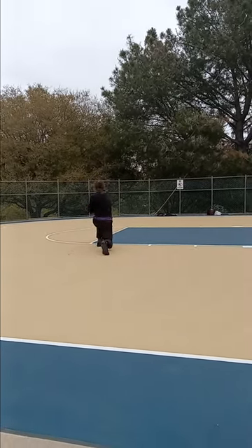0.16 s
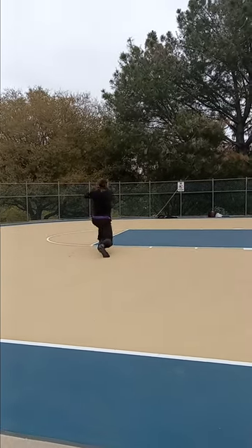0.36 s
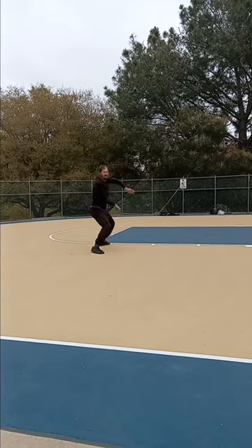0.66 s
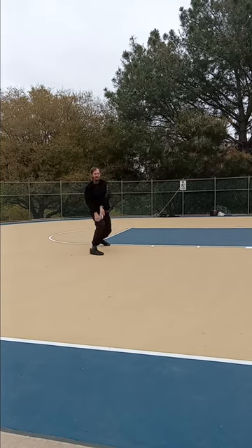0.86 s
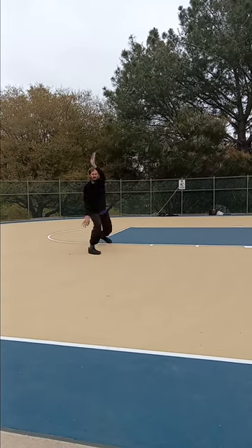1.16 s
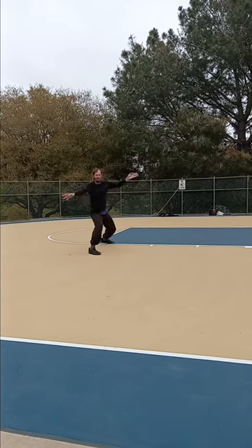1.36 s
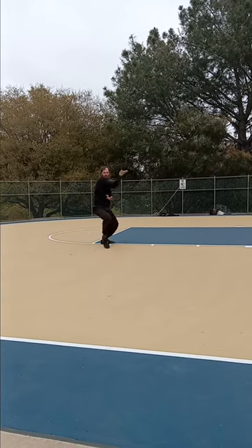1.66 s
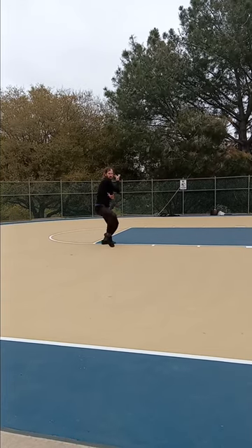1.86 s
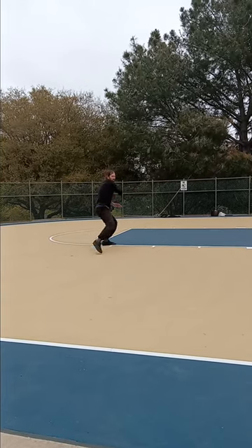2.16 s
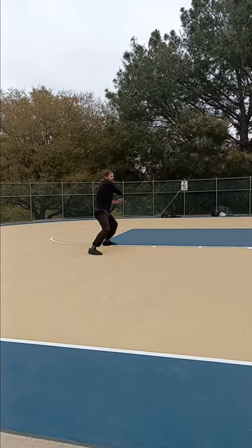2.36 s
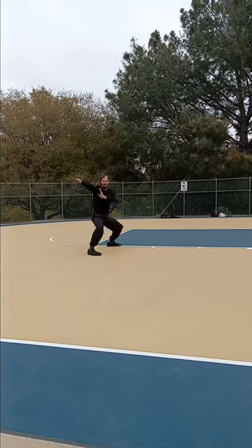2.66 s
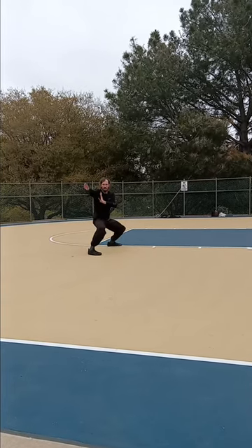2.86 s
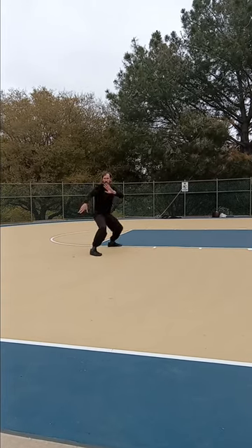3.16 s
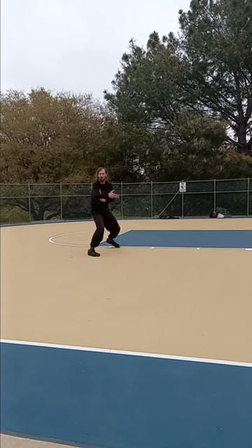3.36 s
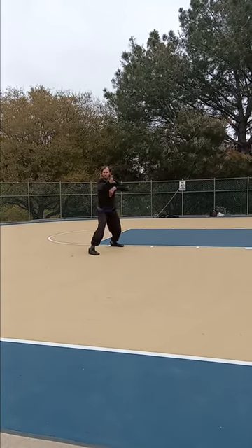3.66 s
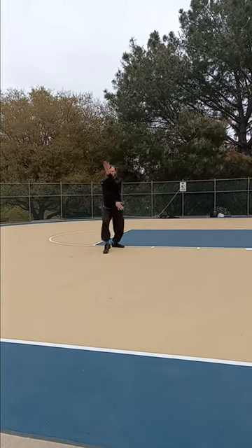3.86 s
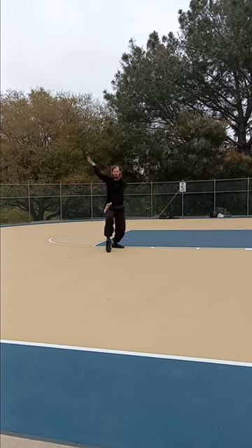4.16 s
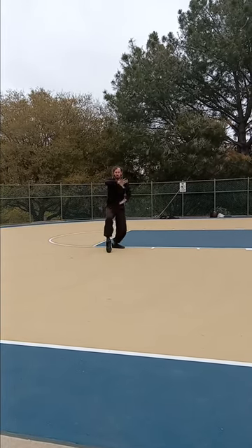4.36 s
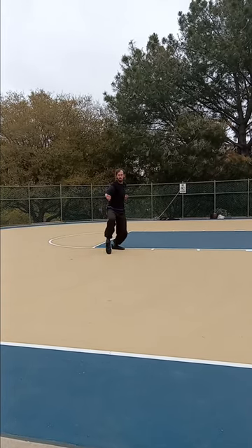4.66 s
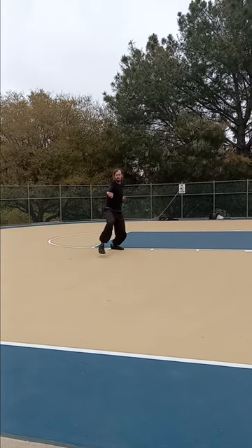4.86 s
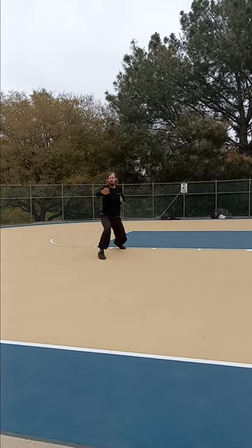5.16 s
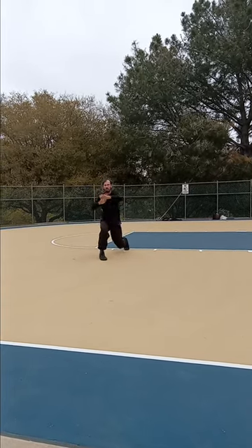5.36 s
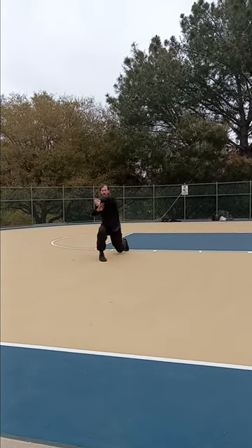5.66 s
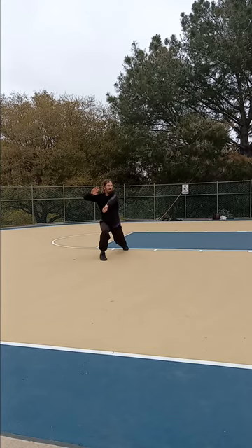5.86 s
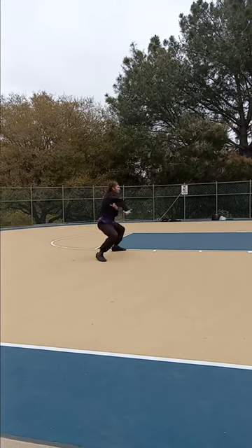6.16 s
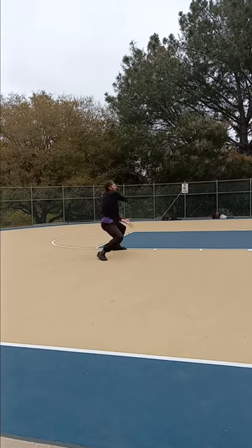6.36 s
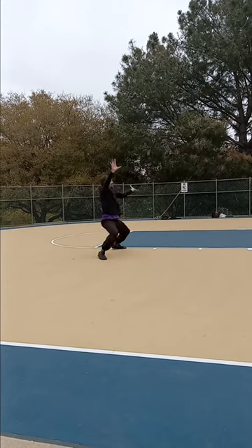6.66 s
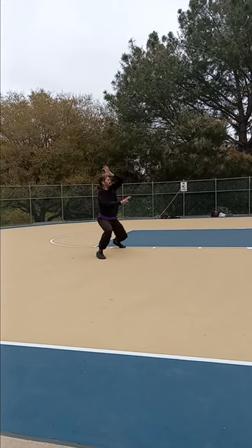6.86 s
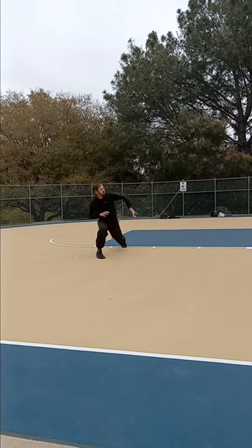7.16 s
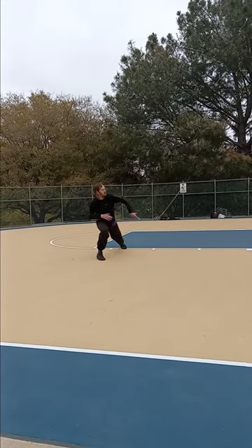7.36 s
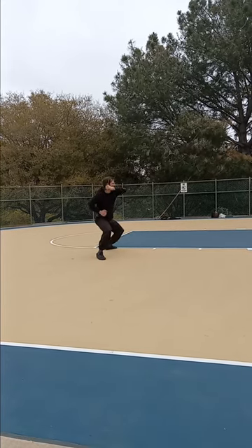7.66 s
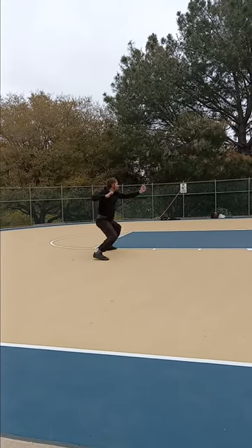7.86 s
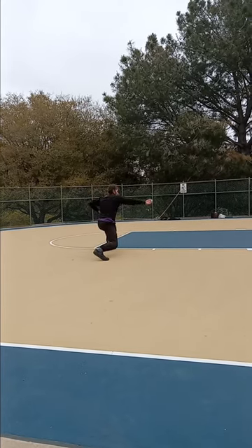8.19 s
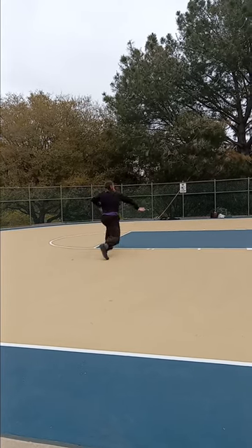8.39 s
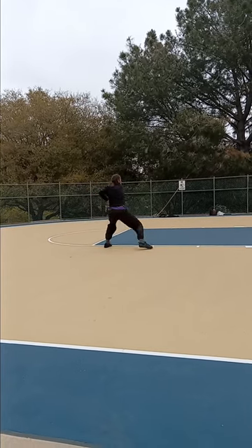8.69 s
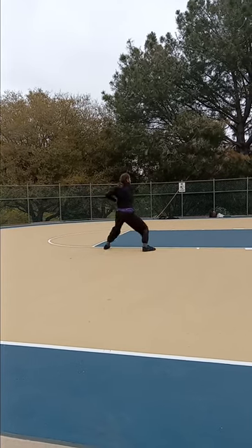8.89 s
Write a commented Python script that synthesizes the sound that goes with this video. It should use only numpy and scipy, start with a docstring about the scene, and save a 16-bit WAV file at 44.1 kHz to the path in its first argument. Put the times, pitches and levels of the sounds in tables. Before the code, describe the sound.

Shoes scuff and scrape on a hard outdoor court and sleeves swish while small birds chirp and trill nearby.

```python
"""Martial arts form on an outdoor court

Some metres away, soles pivot and scrape over grit, feet land softly, and sleeves swish with a reflection
off the hard ground. Small birds chip, trill and sing in the trees behind the fence: pure notes that bend
or buzz. Distant traffic rumbles under a hush of air and leaves."""
import sys
import numpy as np
from scipy import signal
from scipy.fft import rfft, irfft
from scipy.io import wavfile
from scipy.ndimage import uniform_filter1d, map_coordinates

SR = 44100
rng = np.random.default_rng(int(sys.argv[2]) if len(sys.argv) > 2 else 0)


def inscribe(sig):
    """Save sig as 16-bit PCM at rate SR to the path in sys.argv[1].

    A 1-D sig is mono; a 2-D sig holds one channel per row.
    Samples are clipped to [-1, 1] before scaling.
    """
    pcm = np.round(np.clip(np.atleast_2d(sig).T, -1, 1) * 32767)
    wavfile.write(sys.argv[1], SR, pcm.astype(np.int16))


N = 398214
TIME_S, FREQS_HZ = np.arange(N) / SR, np.fft.rfftfreq(N, 1 / SR)
CONTROL_S = TIME_S[::16]

# Traffic spectrum. Each row: frequency in Hz, relative density in dB.
TRAFFIC_SPECTRUM = [(13, -42), (22, -30.5), (56, -1), (80, 5), (183, 0.5), (232, -9.5), (332, -12),
                    (520, -23.5), (680, -62), (1140, -120)]
# Spectrum of air and leaves. Each row: frequency in Hz, relative density in dB.
AIR_SPECTRUM = [(15, -39), (25, -9), (76, 11), (195, -12), (575, -20.5), (887, -12.5), (1440, -16.5),
                (1650, -19.5), (3430, -22.5), (3920, -24.5), (4490, -24.5), (5280, -22), (6560, -21.5),
                (8360, -44), (16000, -58)]
# Echo tail of fence and foliage. Each row: frequency in Hz, 60 dB decay time in seconds.
TAIL_T60 = [(300, .5), (2000, 0.39), (5000, 0.26), (12000, 0.76)]
# Falling contact calls. Each row: start and length in seconds, starting pitch in Hz, level in dB.
BIRD_CHIPS = [(0.002, 0.032, 5260, -60.5), (0.146, 0.019, 5140, -46), (0.909, 0.037, 5200, -50),
              (1.223, 0.036, 5600, -44.5), (2.044, 0.073, 5200, -56.5), (2.653, 0.041, 5400, -48.5),
              (2.686, 0.12, 5240, -49.5), (2.878, 0.034, 5700, -46.5), (2.965, 0.07, 5210, -47.5),
              (3.21, 0.076, 5120, -47), (3.432, 0.073, 5200, -45), (4.083, 0.0343, 5820, -39.5),
              (4.707, 0.032, 5260, -48), (5.049, 0.037, 5870, -35.5), (5.46, 0.056, 5230, -59.5),
              (5.997, 0.029, 5730, -37), (6.417, 0.032, 5200, -57), (7.434, 0.048, 5450, -63.5),
              (7.495, 0.021, 5850, -44.5), (7.929, 0.061, 5730, -57.5), (8.174, 0.067, 5230, -64.5),
              (8.735, 0.04, 5800, -42)]
# Downward song notes. Each row: start and length in seconds, starting pitch in Hz, level in dB.
BIRD_SLURS = [(1.911, 0.032, 3630, -54.5), (2.101, 0.028, 4120, -59), (2.132, 0.015, 3800, -54),
              (2.24, 0.031, 4200, -59), (2.264, 0.033, 3700, -47.5), (2.529, 0.018, 3760, -49.5),
              (2.602, 0.016, 3690, -47), (2.691, 0.029, 5120, -52.5), (2.725, 0.018, 4280, -51.5),
              (2.894, 0.029, 3850, -52.5), (3.151, 0.046, 5450, -50), (3.47, 0.044, 5160, -50),
              (3.517, .037, 3600, -47), (3.795, 0.044, 3240, -51), (3.953, 0.07, 3230, -50),
              (7.766, 0.042, 3360, -65.5), (7.924, .06, 3290, -63.5)]
# Upward song notes. Each row: start and length in seconds, starting pitch in Hz, level in dB.
BIRD_FLICKS = [(1.968, .022, 3100, -60.5), (2.117, 0.0173, 3000, -57), (2.565, 0.0197, 2950, -59),
               (2.752, 0.049, 3500, -53)]
# Near-level song notes. Each row: start and length in seconds, final pitch in Hz, relative level in dB.
BIRD_WHISTLES = [(0.622, 0.068, 2766, -68.5), (0.715, 0.12, 3920, -73), (1.552, 0.066, 7400, -70),
                 (2.741, 0.016, 3480, -43.5), (2.921, 0.033, 3460, -46), (3.015, 0.068, 3800, -57),
                 (3.238, 0.11, 3390, -46), (3.27, .08, 4990, -56), (4.133, 0.13, 4260, -66.5),
                 (4.637, 0.093, 7780, -79), (6.086, 0.083, 4400, -66), (6.557, 0.065, 4440, -68.5),
                 (8.191, 0.069, 4430, -69.5)]
# Buzzes and held notes. Each row: start, length and rise in seconds, starting pitch and fall in Hz,
# relative level in dB, pitch swing in Hz.
BIRD_TRILLS = [ (1.665, 0.077, .008, 5470, 80, -46.5, 150), (1.736, 0.16, 0.0054, 5430, 50, -44, 150),
               (3.827, 0.23, 0.055, 5360, 10, -52, 85), (3.933, 0.43, 0.026, 5397, 60, -51, 90),
               (4.233, 0.31, 0.038, 5326, 4, -48.5, 14), (4.468, 0.19, 0.031, 4090, 1260, -51.5, 340),
               (4.482, 0.29, 0.024, 5395, 8, -58.5, 20), (4.658, 0.062, 0.019, 5370, 5, -47.5, 14),
               (5.0, .09, .05, 5540, 120, -49, 30), (6.26, .17, .05, 5400, 60, -52, 100),
               (7.966, .21, 0.1, 5270, 135, -51, 100), (8.51, .24, .02, 5272, 5, -52, 14),
               (8.76, 0.28, 0.027, 5335, 19, -53.5, 120), (8.87, .3, .1, 5335, 5, -50, 25), ]
# Weight landing on a foot. Each row: start in seconds, level in dB.
LANDINGS = [(0.259, -49), (1.028, -45), (1.509, -47), (3.159, -50.5), (3.611, -50), (4.277, -50.5),
            (5.254, -53.5), (6.739, -52), (7.52, -55.5), (8.578, -52), (8.86, -55)]
# Spectrum of the swish, with a faint microphone fizz near 15 kHz.
# Each row: frequency in Hz, relative density in dB.
SWISH_SPECTRUM = [(450, -33), (750, -9), (1300, -5.5), (1900, -1.5), (2800, 0), (4500, -2.5), (5400, -9.5),
                  (6400, -1.5), (7200, -10.5), (8200, -24.5), (11000, -38.5), (13500, -73), (15500, -29)]
# Ground reflection as the arms rise and fall. Each row: time and delay in seconds, gain from 0 to 1.
GROUND_ECHO = [(.5, 0.00118, 0.25), (2.46, 0.00111, 0.7), (5.16, 0.00114, 1), (5.28, 0.00111, 1),
               (6.93, 0.001045, 0.75), (8.95, 0.0012, 0.8)]
# Arm sweeps. Each row: fastest moment, rise and fall in seconds, relative rustle level in dB,
# low flutter and hiss in dB re rustle.
ARM_SWEEPS = [ (0.49, 0.12, 0.21, -59.5, -13, 13.5), (2.47, 0.16, 0.13, -55.5, -6, 10),
              (2.55, 0.13, 0.16, -54, -1, -16), (3.32, 0.067, 0.38, -74, -20, 14.5),
              (5.0, .08, .1, -73.5, -12, 17.5), (5.185, 0.096, 0.11, -50, -14, 3),
              (5.234, 0.045, 0.072, -53.5, 5.5, -3), (5.27, 0.051, 0.14, -68, 12.5, -23),
              (5.64, 0.12, 0.17, -74, 1, 5), (5.81, 0.24, 0.21, -69.5, -3, -18),
              (6.69, 0.16, 0.13, -77.5, 0, 18), (6.84, 0.14, 0.1, -71, 4, 13),
              (6.939, 0.16, 0.15, -61, 0, 7), (7.15, 0.11, 0.14, -69.5, 3, 4.5),
              (8.899, 0.053, 0.23, -66.5, -18, 7), (9.02, 0.075, .12, -71, 6.5, 22), ]
# Short bright ticks and knocks in and between the scuffs. Each row: start in seconds,
# relative level in dB, centre frequency in Hz, decay in seconds.
TICKS = [(0.279, -45, 1320, 0.056), (.298, -49.5, 850, 0.044), (.303, -32, 6000, 0.0025),
         (1.325, -26, 5500, 0.0024), (1.45, -32, 2500, 0.012), (1.957, -30, 4850, 0.00027),
         (2.076, -50, 7100, 0.00047), (2.984, -52, 6040, 0.002), (3.048, -48, 1505, 0.029),
         (4.458, -57, 2950, 0.01), (4.766, -47, 3750, 0.0011), (4.807, -37, 2540, 0.0044),
         (5.038, -48, 6350, 0.0019), (6.5, -44, 4480, 0.00026), (7.283, -46, 2220, 0.01),
         (8.475, -39, 4430, 0.011), (8.828, -46, 1280, 0.012)]
# Spectrum of the scrape, with a faint microphone fizz near 15 kHz.
# Each row: frequency in Hz, relative density in dB.
SCRAPE_SPECTRUM = [(260, -74), (450, -57), (674, -32), (806, -35), (1380, -15.5), (1810, -15), (2870, 3),
                   (3430, 1.5), (4630, 0.5), (4990, -3), (6240, -1), (6830, -3.5), (8290, -24),
                   (13200, -47.5), (16000, -30.5)]
# Pushes of a sole. Each row: start, rise, hold and release in seconds, rasp level in dB,
# body and hiss in dB re rasp.
SOLE_PUSHES = [ (0.156, 0.079, 0.014, 0.026, -50, -25, 4), (0.272, 0.044, 0.024, 0.085, -38, -9.5, 4.5),
               (1.099, 0.0098, 0.074, 0.027, -72, -6, 11), (1.254, 0.025, 0.029, 0.17, -37, -13, 0.5),
               (1.302, 0.044, .012, 0.14, -47.5, -5, 14.5), (1.377, 0.026, .005, 0.087, -44, -8, 2.5),
               (1.415, 0.028, 0.024, 0.055, -45, -2, -2), (1.448, 0.0039, 0.0028, 0.0098, -35, -8, 0),
               (1.461, .025, .017, 0.022, -39.5, -8, 3), (1.493, 0.043, 0.0046, 0.083, -58, -9.5, 4),
               (2.255, 0.076, 0.032, 0.044, -46.5, -0.5, -3.5), (2.37, 0.034, 0.13, 0.2, -56.5, -16, -1.5),
               (2.738, 0.065, 0.0056, 0.039, -49.5, -12, -25), (3.029, 0.023, 0.044, 0.051, -61, -10, 7.5),
               (3.444, 0.03, 0.012, 0.037, -51.5, -9.5, -16), (3.496, 0.063, 0.054, 0.1, -43.5, -9, 3.5),
               (3.608, 0.063, 0.077, 0.075, -49, -1, 0.5), (7.274, 0.019, 0.009, 0.051, -55, 0.5, -8),
               (7.488, 0.029, 0.007, 0.042, -44, -17, -3), (7.545, 0.017, 0.0053, 0.032, -35, -40, -14),
               (7.562, .015, 0.0038, 0.13, -56.5, -10, -6), (7.976, 0.057, .01, .04, -54, -12, -4),
               (8.015, 0.012, 0.033, 0.048, -46, -11.5, -13.5), (8.123, .018, .008, 0.038, -63, -23, 3),
               (8.47, 0.0033, 0.029, 0.033, -37, -7.5, 0.5), (8.618, 0.039, 0.013, 0.043, -52.5, -15, -5),
               (8.813, 0.017, 0.0024, 0.045, -67.5, 2, 17), ]


def amp(db):
    """Decibels to gain."""
    return 10 ** (np.asarray(db) / 20)


def unit(x):
    """Scales to rms 1."""
    return x / np.sqrt(np.mean(x ** 2) + 1e-20)


def lookup(table, hz):
    """Interpolates on a log-frequency axis."""
    table_hz, values = np.transpose(table)
    return np.interp(np.log(hz + 1), np.log(table_hz + 1), values)


def shaped(x, gain):
    """Filters by a gain per frequency."""
    return irfft(rfft(x) * gain, N)


def highpass(hz, order=8):
    """High-pass gain curve."""
    ratio = (FREQS_HZ / hz) ** order
    return ratio / np.sqrt(1 + ratio ** 2)


def lowpass(hz, order=8):
    """Low-pass gain curve."""
    return 1 / np.sqrt(1 + (FREQS_HZ / hz) ** (2 * order))


def band_rms(x, low_hz, high_hz):
    """Rms within one band."""
    return np.std(shaped(x, (FREQS_HZ > low_hz) & (FREQS_HZ < high_hz)))


def wander(hz):
    """Random drift of rms 1, rolled off above hz."""
    return unit(shaped(rng.standard_normal(N), lowpass(hz, order=2)))


def add(mix, start_s, sound):
    """Mixes a sound in at start_s."""
    part = mix[max(round(start_s * SR), 0):][:len(sound)]
    part += sound[:len(part)]


def mottled(x, depth_db, span_s, span_hz):
    """Imposes resonances that swell and fade at random."""
    hz, t, spectra = signal.stft(x, SR, nperseg=512, noverlap=384)
    field = rng.standard_normal(spectra.shape)
    for axis, width in enumerate((span_hz / hz[1], span_s / t[1])):
        for _ in range(2):
            field = uniform_filter1d(field, max(round(width), 1), axis=axis)
    return signal.istft(spectra * amp(depth_db * unit(field)), SR, nperseg=512, noverlap=384)[1][:N]


def traffic(fade_db_per_s=0.78, pass_s=2.95, pass_width_s=0.5, pass_db=5):
    """Far traffic drones; its tyre roar slowly fades and swells once as a vehicle passes."""
    rumble = unit(shaped(rng.standard_normal(N), amp(lookup(TRAFFIC_SPECTRUM, FREQS_HZ)) * lowpass(473)))
    drone = shaped(rumble, lowpass(222)) * amp(-61.5 + 1.65 * wander(6.9))
    roar = shaped(rumble, highpass(224)) / band_rms(rumble, 214, 480)
    swell_db = pass_db * np.exp(-((TIME_S - pass_s) / pass_width_s) ** 2)
    return drone + roar * amp(-69 - fade_db_per_s * TIME_S + swell_db)


def air(fade_db_per_s=0.49):
    """Air and leaves make a thin, slowly fading hush."""
    noise = mottled(rng.standard_normal(N), depth_db=2.2, span_s=0.056, span_hz=260)
    hush = shaped(noise, amp(lookup(AIR_SPECTRUM, FREQS_HZ)) * highpass(386))
    level_db = -73.5 - fade_db_per_s * TIME_S + 0.08 * wander(6.7)
    return amp(level_db) * hush / band_rms(hush, 530, 1013)


def scatter(x, onset_s, early_db, early_s, echoes_per_s=2000):
    """Fence and foliage return a short cluster of echoes and a thin tail."""
    taps = rng.standard_normal(SR) * (rng.random(SR) < echoes_per_s / SR)
    hz, t, spectra = signal.stft(taps, SR, nperseg=256)
    decay = amp(-60 * t / lookup(TAIL_T60, hz)[:, None]) + amp(early_db) * np.exp(-t / early_s)
    fade_in = np.clip(t / onset_s - 0.5, 0, 1)
    response = signal.istft(spectra * decay * fade_in, SR, nperseg=256)[1]
    return signal.fftconvolve(x, response / np.linalg.norm(response))[:N]


def bird_note(length_s, pitches_hz, db, taper):
    """A pure tone bends through a starting, middle and final pitch; loudest just before midway."""
    progress = np.linspace(0, 1, round(length_s * SR))
    hz = np.polyval(np.polyfit([0, 0.5, 1], pitches_hz, 2), progress)
    envelope = np.abs(np.sin(np.pi * progress ** 0.87)) ** taper
    return amp(db) * np.sqrt(2) * envelope * np.sin(2 * np.pi * np.cumsum(hz) / SR)


def bird_chirps(chip_end_hz=5016, far_below_db=-58):
    """Chips drop and level out, slurs fall, flicks rise. Faint whistles come from deep in the trees."""
    near, far = np.zeros((2, N))
    for start_s, length_s, hz, db in BIRD_CHIPS:
        middle_hz = chip_end_hz + 0.22 * (hz - chip_end_hz)
        add(near, start_s, bird_note(length_s, (hz, middle_hz, chip_end_hz), db, taper=1.1))
    for start_s, length_s, hz, db in BIRD_SLURS:
        add(near, start_s, bird_note(length_s, (hz, 0.91 * hz, 0.78 * hz), db, taper=0.74))
    for start_s, length_s, hz, db in BIRD_FLICKS:
        add(near, start_s, bird_note(length_s, (hz, 1.14 * hz, 1.28 * hz), db, taper=0.77))
    for start_s, length_s, hz, db in BIRD_WHISTLES:
        note = bird_note(length_s, (1.031 * hz, hz, hz), db, taper=0.83)
        add(far if db < far_below_db else near, start_s, note)
    far *= unit(1.4 + wander(80))
    near *= amp(2 * wander(120))
    return near + 1.53 * far + 1.33 * scatter(far, onset_s=0.0039, early_db=-6, early_s=0.017)


def bird_trills(buzz_hz=125, flutter_db=5.5, half_band_hz=260):
    """Pitch swings fast within a narrow band: a wide swing buzzes, a small one is a thin whistle."""
    out = np.zeros(N)
    rate_hz = buzz_hz * (1 + 0.082 * wander(30))
    swing = np.sin(2 * np.pi * np.cumsum(rate_hz) / SR) + 0.2 * wander(160)
    throat = signal.butter(5, half_band_hz, fs=SR, output="sos")
    for start_s, length_s, rise_s, top_hz, fall_hz, db, swing_hz in BIRD_TRILLS:
        on = (TIME_S >= start_s) & (TIME_S < start_s + length_s)
        t = TIME_S[on] - start_s
        envelope = np.minimum(t / rise_s, 1) * np.abs(np.cos(np.pi / 2 * t / length_s)) ** 0.8
        buzz = signal.sosfilt(throat, np.exp(2j * np.pi * np.cumsum(swing_hz * swing[on]) / SR))
        carrier = np.exp(2j * np.pi * np.cumsum(top_hz - fall_hz * t / length_s) / SR)
        out[on] += amp(db) * np.sqrt(2) * envelope * (buzz * carrier).real
    return out * unit(amp(flutter_db * np.tanh(wander(45))))


def footfalls(rise_s=0.014, thud_hz=73.7):
    """A soft shoe gives the ground one dull push of a few cycles."""
    out, t = np.zeros(N), np.arange(SR // 4) / SR
    thud = t / rise_s * np.exp(1 - t / rise_s) * np.sin(2 * np.pi * thud_hz * t)
    for start_s, db in LANDINGS:
        add(out, start_s, amp(db) * thud)
    return out


def friction(texture, strokes_db, mid_band_hz):
    """Plays a texture along strokes, each a low, a middle and a high level curve; powers add."""
    filters = lowpass(1962), highpass(2020) * lowpass(6470), highpass(5660)
    bands_hz = (700, 2000), mid_band_hz, (5800, 9000)
    levels = np.sqrt(np.sum(amp(np.maximum(strokes_db, -200)) ** 2, axis=0))
    return sum(shaped(texture, gain) * np.interp(TIME_S, CONTROL_S, level) / band_rms(texture, *band_hz)
               for gain, level, band_hz in zip(filters, levels, bands_hz))


def sweep_db(peak_s, rise_s, fall_s, depth_db=39):
    """Level curve of a sleeve that speeds up and slows down."""
    t = CONTROL_S - peak_s
    return -depth_db * np.maximum(-t / rise_s, t / fall_s) ** 2.08


def sleeves(dull_hz=8500, flutter_lag_s=0.0067, hiss_lead_s=0.004):
    """Shifting folds hiss, bright then dull; the court's echo a millisecond later combs the spectrum."""
    noise = rng.standard_normal(N) * amp(1.2 * wander(90))
    folds = mottled(noise, depth_db=2.8, span_s=0.06, span_hz=260)
    swish = shaped(folds, amp(lookup(SWISH_SPECTRUM, FREQS_HZ)) * lowpass(dull_hz, order=1))
    times_s, delays_s, gains = np.transpose(GROUND_ECHO)
    delayed_s = TIME_S - np.interp(TIME_S, times_s, delays_s)
    echo = np.interp(TIME_S, times_s, gains) * map_coordinates(swish, [delayed_s * SR], order=3)
    strokes_db = [[rustle_db + flutter_db + sweep_db(peak_s + flutter_lag_s, rise_s, fall_s),
                   rustle_db + sweep_db(peak_s, rise_s, fall_s),
                   rustle_db + hiss_db + sweep_db(peak_s - hiss_lead_s, rise_s, fall_s)]
                  for peak_s, rise_s, fall_s, rustle_db, flutter_db, hiss_db in ARM_SWEEPS]
    return friction(swish + echo, strokes_db, mid_band_hz=(2000, 3300))


def ticks(half_width_octaves=0.16, ring_gain=0.25, fizz_gain=0.03):
    """Each tick or knock is a noise burst around one resonance, which rings for a few cycles."""
    out, t = np.zeros(N), np.arange(4096) / SR
    hz = np.fft.rfftfreq(len(t), 1 / SR)
    for start_s, db, centre_hz, decay_s in TICKS:
        resonance = 1 / (1 + (np.log2((hz + 1) / centre_hz) / half_width_octaves) ** 2)
        burst = unit(irfft(rfft(rng.standard_normal(len(t))) * resonance))
        ring = np.sin(2 * np.pi * centre_hz * t) * np.exp(-centre_hz * t / 5)
        add(out, start_s, amp(db) * (burst + ring_gain * ring) * np.exp(-t / decay_s))
    return shaped(out, highpass(730) * (lowpass(8600, order=14) + fizz_gain))


def push_db(start_s, rise_s, hold_s, release_s, depth_db=23, sag_db_per_s=12):
    """Level curve of a sole that takes weight, slides on and lets go."""
    t = CONTROL_S - start_s
    attack = np.maximum(1 - t / rise_s, 0) ** 2
    release = np.maximum(t - rise_s - hold_s, 0) / release_s
    return -depth_db * (attack + release) - sag_db_per_s * np.clip(t - rise_s, 0, hold_s)


def soles(slips_per_s=3000, spread_db=2, judder_db=1.2):
    """Thousands of tiny slips over grit, bunched by rubber judder, coloured by the shifting contact."""
    sizes = amp(spread_db * np.minimum(rng.exponential(1, N), 4))
    slips = sizes * rng.choice([-1, 1], N) * (rng.random(N) < slips_per_s / SR)
    drive = (unit(slips) + 0.7 * rng.standard_normal(N)) * amp(judder_db * wander(68))
    contact = mottled(drive, depth_db=2.8, span_s=0.02, span_hz=300)
    scrape = shaped(contact, amp(lookup(SCRAPE_SPECTRUM, FREQS_HZ)) * highpass(600))
    strokes_db = [push_db(*timing_s) + rasp_db + np.array([[body_db], [0], [hiss_db]])
                  for *timing_s, rasp_db, body_db, hiss_db in SOLE_PUSHES]
    return friction(scrape, strokes_db, mid_band_hz=(2200, 4700))


def scene():
    """Mono mix: the mover on the open court is nearly dry, the birds in the trees are wetter."""
    mover = soles() + amp(-4) * sleeves() + ticks()
    birds = bird_chirps() + amp(-2) * bird_trills()
    court_echo = amp(-32.5) * scatter(mover, onset_s=0.028, early_db=11, early_s=0.058)
    tree_echo = amp(-8.5) * scatter(birds, onset_s=0.0059, early_db=12, early_s=0.028)
    return (mover + birds + court_echo + tree_echo + footfalls() + traffic() + air())[None]


def record(dry):
    """Steep low-pass at 15.9 kHz."""
    taps = signal.firwin(511, 15900, window=("kaiser", 9), fs=SR)
    return signal.oaconvolve(dry, taps[None], "same")


dry = scene()
out = record(dry)
inscribe(out)
```